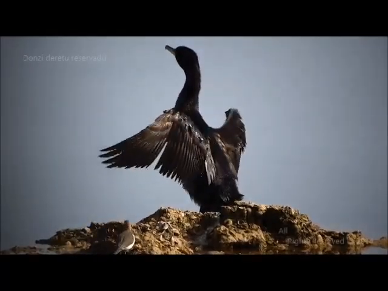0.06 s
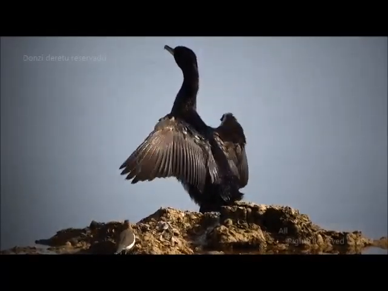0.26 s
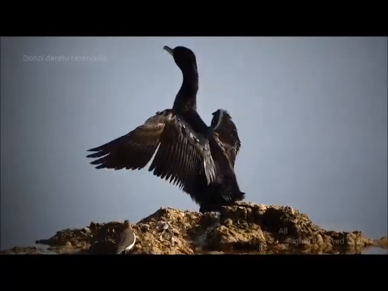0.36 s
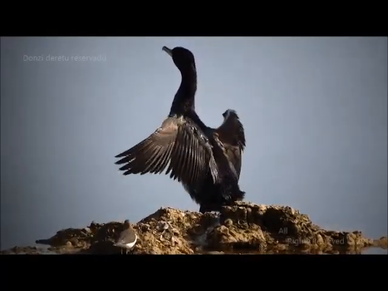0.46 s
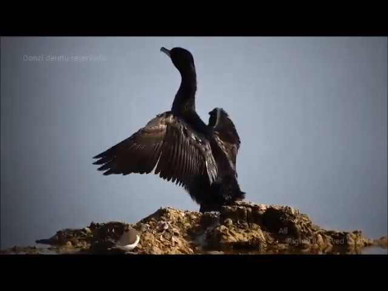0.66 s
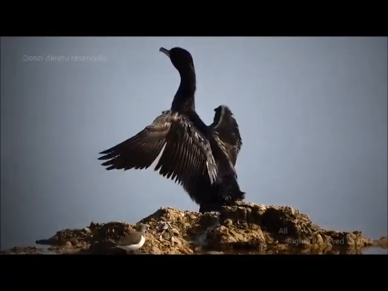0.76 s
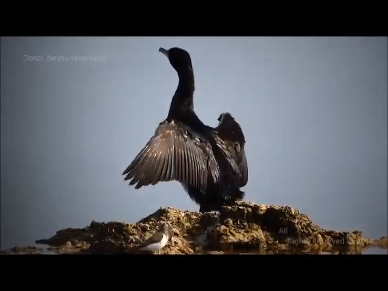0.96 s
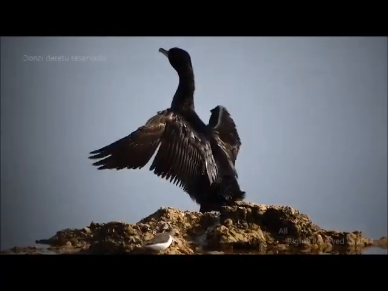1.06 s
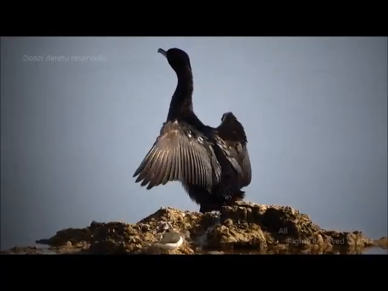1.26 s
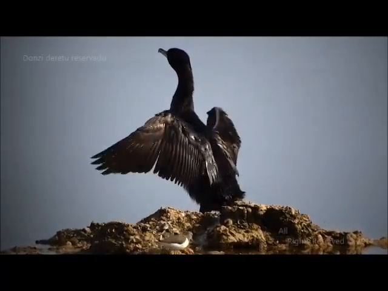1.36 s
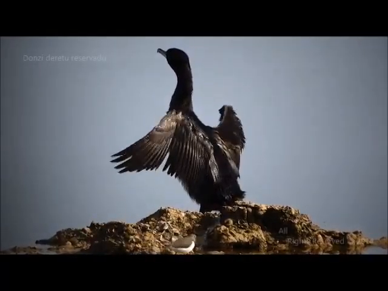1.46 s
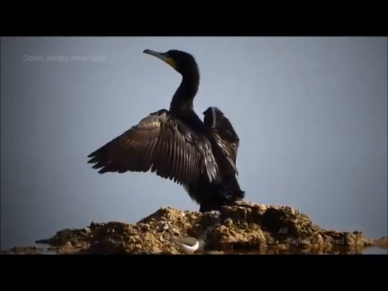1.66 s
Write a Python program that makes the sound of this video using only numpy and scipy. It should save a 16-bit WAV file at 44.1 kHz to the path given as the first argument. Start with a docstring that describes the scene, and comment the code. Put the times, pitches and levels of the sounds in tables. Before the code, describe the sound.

Thin, falling bird peeps repeat beside calm water, with a short creak and faint drips.

```python
"""Soft open air, a low rumble and a faint pulsing whirr lie over calm water; far birds call.
A small shorebird peeps: a thin whistle that drops fast and levels out, scattered by the stones.
Just after, a dry creak ratchets once, its clicks slowing; a treble hiss rises with it and fades.
The bird peeps three more times, while tiny bubbles tick at the rocks now and then."""
import sys
import numpy as np
from scipy import signal
from scipy.fft import rfft, irfft, next_fast_len
from scipy.io import wavfile
from scipy.ndimage import uniform_filter1d, map_coordinates

SR = 44100
rng = np.random.default_rng(int(sys.argv[2]) if len(sys.argv) > 2 else 0)


def dump(signal):
    """Clip the signal to [-1, 1] and save it as 16-bit WAV at the path in sys.argv[1]."""
    limited = np.clip(np.atleast_2d(signal).T, -1, 1)
    pcm = np.round(limited * 32767).astype(np.int16)
    wavfile.write(sys.argv[1], SR, pcm)


N = 74970  # 1.7 seconds


def amp(db):
    """Turn decibels into a number to multiply by."""
    return 10 ** (np.asarray(db) / 20)


def unit(x):
    """Scale a sound to an average (rms) size of 1."""
    return x / np.sqrt(np.mean(x ** 2) + 1e-20)


def along(points, hz):
    """Read between (frequency_hz, value) points, with octaves evenly spaced."""
    freqs, values = np.transpose(points)
    return np.interp(np.log(hz + 1), np.log(freqs + 1), values)


def curves(rows):
    """Join the rows with straight lines: one curve for each column after the time."""
    times, *columns = np.transpose(rows)
    return [np.interp(np.arange(N) / SR, times, column) for column in columns]


def wobble(per_s):
    """A smooth curve through per_s random values a second."""
    return map_coordinates(rng.standard_normal(int(N * per_s / SR) + 4), [np.arange(N) * per_s / SR])


def filtered(x, gain_at):
    """Turn each frequency up or down by gain_at(hz)."""
    size = next_fast_len(N + SR // 2)
    return irfft(rfft(x, size) * gain_at(np.fft.rfftfreq(size, 1 / SR)), size)[..., :N]


def rush(spectrum, alike):
    """Shaped stereo noise; alike (a number or a table) is 1 when both ears hear the same."""
    def gains(hz):
        likeness = along(alike, hz) if np.ndim(alike) else np.full_like(hz, alike)
        angle = np.arccos(likeness) / 2
        return amp(along(spectrum, hz)) * [np.cos(angle), np.sin(angle)]
    mid, side = filtered(rng.standard_normal((2, N)), gains)
    return unit(np.array([mid + side, mid - side]))


def echoes(x, fade_s):
    """A spray of echoes, different at each ear. Here and below, a fade is the time to drop 60 dB."""
    t = np.arange(SR // 2) / SR
    tail = rng.standard_normal((2, len(t))) * amp(-60 * t / fade_s)
    return signal.fftconvolve(x[None], tail / np.linalg.norm(tail[0]), axes=1)[:, :N]


def add(track, start_s, sound):
    """Mix a sound into a track."""
    part = track[round(start_s * SR):][:len(sound)]
    part += sound[:len(part)]


def whistle(hz, db, start_s, end_s, tones=((1, 0),), jitter=0.0043):
    """A slightly shaky tone that starts and stops softly; tones holds (pitch_multiple, gain_db)."""
    t = np.arange(N) / SR
    edge_s = 0.0022
    inside_s = np.minimum(t - start_s, end_s - t)
    gate = np.sin(np.pi / 2 * np.clip(inside_s / edge_s + 1, 0, 1)) ** 2
    shaky_hz = uniform_filter1d(hz, size=130) * (1 + jitter * wobble(per_s=600))
    shaky_db = db + 0.72 * wobble(per_s=250)
    phase = 2 * np.pi * np.cumsum(shaky_hz) / SR
    wave = sum(amp(gain_db) * np.sin(multiple * phase) for multiple, gain_db in tones)
    return np.sqrt(2) * gate * amp(shaky_db) * wave


def bird_note(rows, tones=((1, 0),)):
    """A whistle that follows rows of (time_s, pitch_hz, level_db)."""
    return whistle(*curves(rows), rows[0][0], rows[-1][0], tones)


# The air's tone, from low to high: frequency_hz, gain_db
AIR_SPECTRUM = [(20, -2), (45, 0), (130, 0.5), (200, -3.5), (330, -6), (800, -7.5), (1400, -9.5),
                (3000, -16.5), (5000, -18.5), (9000, -27), (12000, -27.5), (15500, -34)]
# How alike the air is at both ears: frequency_hz, likeness_0_to_1
AIR_ALIKE = [(60, 0.96), (130, 0.97), (280, 0.3), (1000, 0), (4000, 0.2), (13000, 0.84)]

def open_air():
    """A soft, steady rush, strongest in the bass."""
    return amp(-65.5) * rush(AIR_SPECTRUM, AIR_ALIKE)


# The rumble's tone: frequency_hz, gain_db
RUMBLE_SPECTRUM = [(20, -28), (45, -25), (72, 12.5), (100, -12), (200, -26.5), (600, -120)]
# Its swells: time_s, level_db
RUMBLE_LEVEL = [(0, -65.5), (.17, -95), (.28, -69.5), (.5, -67.5), (.68, -68), (.81, -67.5), (.94, -76.5),
                (1.16, -75), (1.22, -59.5), (1.29, -70.5), (1.7, -87.5)]

def rumble():
    """Deep noise that swells and sinks."""
    return amp(curves(RUMBLE_LEVEL)[0]) * rush(RUMBLE_SPECTRUM, alike=0.99)


# The hiss's tone: frequency_hz, gain_db
HISS_SPECTRUM = [(1200, -11), (2000, -5.5), (3200, -7.5), (3850, 1), (4800, -5), (5600, -3.5), (7000, -1),
                 (8700, 2.5), (9700, -5.5), (11000, -15), (15000, -23)]
# Its rise and fall: time_s, level_db
HISS_LEVEL = [(0, -74.5), (.31, -68.5), (.37, -59), (.47, -59.5), (.59, -61), (.7, -65.5), (.92, -67),
              (1.1, -72), (1.4, -77), (1.7, -81)]

def hiss():
    """High noise that rises with the creak and slowly fades."""
    return amp(curves(HISS_LEVEL)[0]) * rush(HISS_SPECTRUM, alike=0.97)


# The tone of the hum in the whirr: frequency_hz, gain_db
HUM_SPECTRUM = [(100, -120), (330, -22), (445, -1), (485, -13.5), (535, 2), (620, -1), (700, -18),
                (1000, -23.5), (2500, -120)]
# How loud the hum and the beats each are: time_s, level_db
WHIRR_LEVEL = [(0, -73.5), (.5, -69.5), (.68, -77), (.8, -68), (1.0, -72), (1.1, -68), (1.3, -72),
               (1.7, -71.5)]

def whirr():
    """A faint mechanism ticks over evenly; each beat rings briefly over a narrow hum."""
    beats_per_s, beat_hz, fade_s = 24.93, 555.4, 0.049
    beats, t = np.zeros(N), np.arange(SR // 10) / SR
    for start_s in np.arange(0.011, N / SR, 1 / beats_per_s):
        detune, gain_db = rng.normal(0, [0.04, 2])  # no two beats are quite the same
        ring = np.sin(2 * np.pi * beat_hz * (1 + detune) * t)
        add(beats, start_s, amp(gain_db - 60 * t / fade_s) * ring)
    hum = rush(HUM_SPECTRUM, alike=0.33)
    return amp(curves(WHIRR_LEVEL)[0]) * (unit(beats) + hum)


# A short nasal note and a whistle that rises, then falls: time_s, pitch_hz, level_db
NASAL_NOTE = [(0, 1223, -60), (.012, 1193, -58.5), (0.021, 1114, -69)]
ARCHING_WHISTLE = [(.116, 4090, -79), (.145, 4630, -69.5), (.168, 4556, -69.5), (.185, 4300, -89),
                   (.215, 4030, -80)]
# The overtones that make up the nasal note: pitch_multiple, gain_db
NASAL_TONES = [(3, 2), (4, 0), (6, -11.5)]
# Faint peeps and low rising hoots: start_s, length_s, from_pitch_hz, toward_pitch_hz, level_db
FAR_PEEPS = [(0.025, .016, 4780, 4550, -68.5), (0.047, 0.031, 5550, 4600, -63),
             (.947, 0.019, 5530, 5280, -68), (0.972, 0.019, 5530, 5380, -69.5),
             (1.632, 0.035, 4960, 4790, -72), (1.673, 0.023, 4360, 4420, -69)]
FAR_HOOTS = [(0.491, 0.044, 573.5, 625, -67.5), (0.527, 0.078, 1133, 1260, -76),
             (0.777, 0.06, 602.6, 647, -67.5)]

def far_birds():
    """Distant birds whistle and hoot, half lost in echoes."""
    glide_s = 0.0093
    t = np.arange(N) / SR
    calls = bird_note(NASAL_NOTE, NASAL_TONES) + bird_note(ARCHING_WHISTLE)
    for start_s, length_s, from_hz, toward_hz, db in FAR_PEEPS + FAR_HOOTS:
        age_s = np.maximum(t - start_s, 0)
        hz = toward_hz + (from_hz - toward_hz) * np.exp(-age_s / glide_s)
        calls += whistle(hz, db, start_s, start_s + length_s, jitter=0.009)
    return calls + amp(-6) * echoes(calls, fade_s=0.17)


# Water ticking on the rocks: start_s, level_db, pitch_hz
DRIPS = [(0.247, -51.5, 2100), (0.3114, -49, 2210), (0.865, -50, 2190), (1.232, -55, 2080),
         (1.3273, -43.5, 2295), (1.3765, -50, 2290), (1.399, -56, 2300), (1.676, -54.5, 2680)]
# The range a splash fills: low_hz, high_hz
SPLASH_BAND = [2240, 2700]

def drips():
    """Tiny bubbles rise in pitch as they die away, each in a dull splash."""
    attack_s, bubble_fade_s, splash_fade_s, rise_per_s = 0.00066, 0.014, 0.03, 7.1
    out, t = np.zeros(N), np.arange(SR // 40) / SR
    band = signal.butter(2, SPLASH_BAND, "band", fs=SR, output="sos")
    onset = 1 - np.exp(-t / attack_s)
    for start_s, db, hz in DRIPS:
        phase = 2 * np.pi * hz * t * (1 + rise_per_s * t / 2)
        bubble = amp(-60 * t / bubble_fade_s) * np.sin(phase)
        noise = unit(signal.sosfilt(band, rng.standard_normal(len(t))))
        splash = amp(-11 - 60 * t / splash_fade_s) * noise
        add(out, start_s, amp(db) * onset * (bubble + splash))
    return out + amp(-12) * echoes(out, fade_s=0.058)


# The scuff's tone: frequency_hz, gain_db
SCUFF_SPECTRUM = [(30, -33), (100, 5.5), (400, -10), (800, 2), (1100, -5.5), (8000, -22)]
# Its quick swell: time_s, level_db
SCUFF_LEVEL = [(.3, -100), (.335, -63.5), (.37, -58), (.41, -82), (.47, -100)]

def scuff():
    """A soft, dull puff of noise under the creak's first clicks."""
    return amp(curves(SCUFF_LEVEL)[0]) * rush(SCUFF_SPECTRUM, alike=0.98)


# The creak's clicks, one for each slip: start_s, gain_db, snap_pitch_hz
CREAK_CLICKS = [(0.332, -41.5, 9000), (0.3373, -42, 8850), (.341, -37.5, 8750), (0.3444, -37, 8700),
                (0.3478, -37, 8840), (.357, -31, 8930), (0.3659, -29, 8850), (.376, -26.5, 8500),
                (0.3954, -30, 8460), (0.4167, -25.5, 8630), (.438, -26.5, 9300), (0.5208, -51, 8700)]
# The tones that ring in every click: pitch_hz, gain_db, fade_s
CREAK_TONES = [(2003, -16, 0.01), (2540, -18, 0.0088), (3110, -12, 0.0086), (3940, -5, 0.0098),
               (4280, -9.5, 0.0085), (5440, 2, 0.0058), (5940, -4.5, .0075), (7130, -7.5, 0.0094),
               (8300, -9, 0.0089), (9600, -25, 0.001), (13500, -21, 0.0017)]

def creak():
    """Each gritty slip snaps at its own pitch and rings the same short tones; late ones are fuller."""
    low_hz, fuller_db_per_s = 4030, 77  # tones below low_hz grow as the creak slows
    snap_db, snap_fade_s, grit_fade_s, attack_s = -4, 0.0099, 0.005, 0.00006
    out, t = np.zeros(N), np.arange(SR // 25) / SR
    onset = 1 - np.exp(-t / attack_s)
    for start_s, db, snap_hz in CREAK_CLICKS:
        fuller_db = fuller_db_per_s * (start_s - 0.4)
        ring = np.zeros(len(t))
        for hz, gain_db, fade_s in CREAK_TONES + [(snap_hz, snap_db, snap_fade_s)]:
            lowness = np.clip(np.log2(low_hz / hz), 0, 1)
            ring += amp(gain_db + fuller_db * lowness - 60 * t / fade_s) * np.cos(2 * np.pi * hz * t)
        grit = amp(-25 - 60 * t / grit_fade_s) * rng.standard_normal(len(t))
        slip = (t == 0) + grit  # one sharp kick with a rough tail
        add(out, start_s, amp(db) * onset * signal.fftconvolve(slip, ring)[:len(t)])
    # Keep what lies between 1700 and 11600 Hz.
    out = signal.sosfilt(signal.butter(8, 1700, "high", fs=SR, output="sos"), out)
    out = signal.sosfilt(signal.butter(2, 11600, "low", fs=SR, output="sos"), out)
    return out + amp(-12) * echoes(out, fade_s=0.041)


# The near bird's four peeps, the first with a short closing note: time_s, pitch_hz, level_db
FIRST_PEEP = [(.231, 6270, -59), (.238, 6830, -49), (.242, 6050, -45.5), (.248, 4960, -44.5),
              (.258, 4650, -46.5), (.279, 4870, -48), (.297, 4670, -46.5), (.313, 4540, -49),
              (.328, 4460, -59.5)]
CLOSING_NOTE = [(0.351, 4750, -52), (.357, 4540, -40), (0.368, 4245, -46), (0.38, 4200, -44)]
SECOND_PEEP = [(0.63, 6590, -51), (.634, 6775, -37.5), (.641, 5940, -34.5), (0.648, 5270, -33),
               (0.662, 4520, -38.5), (.673, 4070, -44.5), (.684, 3766, -44.5), (0.697, 3690, -45),
               (.715, 3665, -51)]
THIRD_PEEP = [(0.987, 7000, -68), (.993, 7300, -51), (.999, 5830, -41), (1.002, 5130, -39.5),
              (1.008, 4340, -43), (1.016, 4150, -40.5), (1.025, 3903, -49), (1.043, 3926, -48),
              (1.053, 3827, -53)]
FOURTH_PEEP = [(1.321, 6320, -67), (1.329, 7000, -47), (1.337, 5320, -42), (1.343, 4730, -45),
               (1.356, 4470, -49.5), (1.374, 4460, -48), (1.412, 4438, -53), (1.42, 4570, -55.5),
               (1.432, 4720, -54), (1.442, 4450, -43.5), (1.453, 4145, -52), (1.462, 4050, -59)]
# Boosts and cuts that colour the overtone an octave up: frequency_hz, gain_db
OCTAVE_COLOUR = [(7100, 0), (7450, -8), (8200, 1.5), (9000, 3.5), (10000, -12.5), (11500, -15),
                 (13500, -19)]

def shorebird():
    """Falling peeps with a weak octave, a little to the right; the rocks scatter their high starts."""
    scatter_above_hz, pan_db = 4360, 1.82
    notes = (FIRST_PEEP, CLOSING_NOTE, SECOND_PEEP, THIRD_PEEP, FOURTH_PEEP)
    song = sum(bird_note(note, tones=[(1, 0), (2, -23)]) for note in notes)
    song = filtered(song, lambda hz: amp(along(OCTAVE_COLOUR, hz)))
    highs = filtered(song, lambda hz: 1 - 1 / (1 + (hz / scatter_above_hz) ** 8))
    scattered = amp(-6) * echoes(highs, fade_s=0.058)[0]
    near = (song + scattered) * amp([[-pan_db], [pan_db]])
    return near + amp(-23) * echoes(song, fade_s=0.4)


def scene():
    """Everything on the shore, added together."""
    background = open_air() + rumble() + hiss() + whirr()
    return background + shorebird() + far_birds() + creak() + scuff() + drips()


def record(dry):
    """Cut away the very highest treble."""
    return filtered(dry, lambda hz: hz < 15850)


dry = scene()
out = record(dry)
dump(out)
```